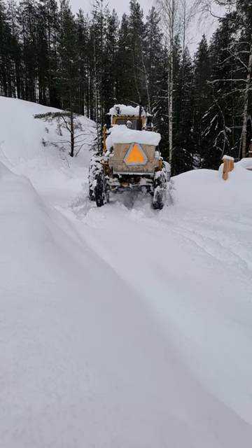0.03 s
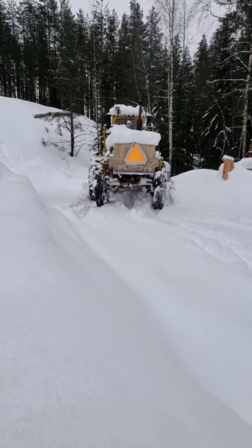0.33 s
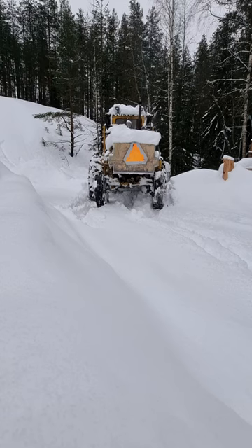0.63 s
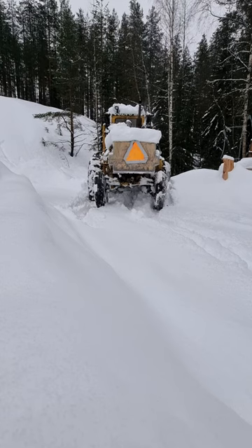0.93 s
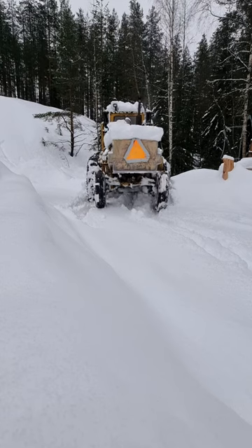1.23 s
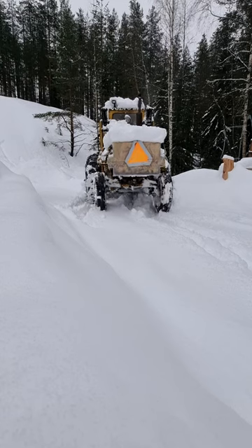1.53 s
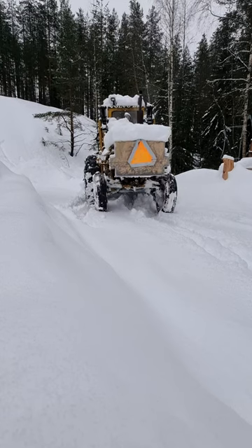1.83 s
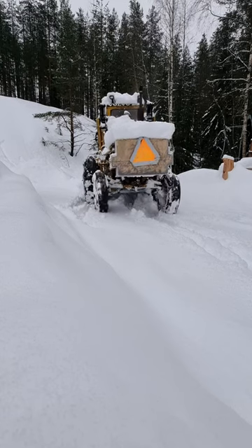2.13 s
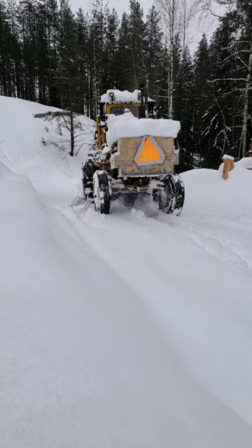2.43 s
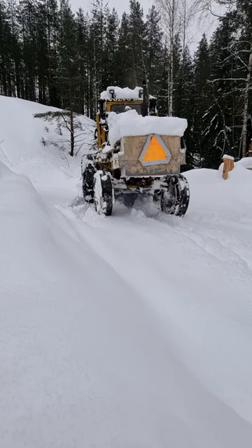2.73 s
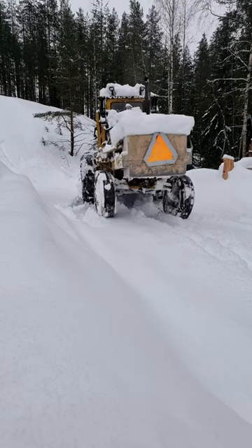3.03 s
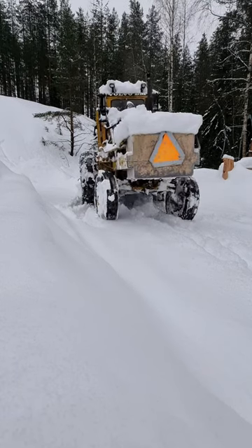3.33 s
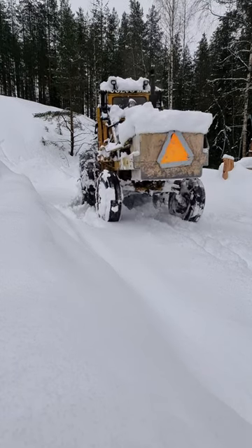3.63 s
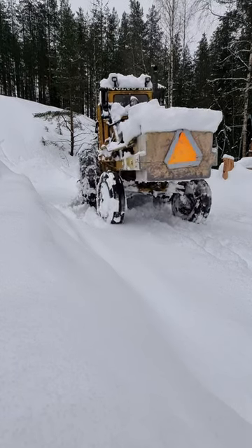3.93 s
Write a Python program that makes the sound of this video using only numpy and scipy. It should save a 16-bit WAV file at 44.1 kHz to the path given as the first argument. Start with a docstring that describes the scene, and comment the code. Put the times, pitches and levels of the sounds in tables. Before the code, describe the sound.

A loader's diesel engine chugs and clatters, eases off, then labours again at a slower pace.

```python
"""A diesel loader in the snow

A slow loader backs towards the listener; its engine labours, slackens, then labours again.
Each firing of fuel knocks the engine block and sends a deep thump through the exhaust pipe.
Under load, bursting gas adds a sharp, falling bark. Moving parts clatter; the forest echoes faintly."""
import sys
import numpy as np
from scipy import signal
from scipy.fft import rfft, irfft, next_fast_len
from scipy.io import wavfile
from scipy.ndimage import map_coordinates

SR = 44100
rng = np.random.default_rng(int(sys.argv[2]) if len(sys.argv) > 2 else 0)


def inscribe(sig):
    """Save sig as 16-bit PCM at rate SR to the path in sys.argv[1].

    A 1-D sig is mono; a 2-D sig holds one channel per row.
    Samples are clipped to [-1, 1] before scaling.
    """
    pcm = np.round(np.clip(np.atleast_2d(sig).T, -1, 1) * 32767)
    wavfile.write(sys.argv[1], SR, pcm.astype(np.int16))


N = 176400
TIME = np.arange(N) / SR

# how fast the engine runs (time [s], firings [per s])
ENGINE_SPEED = [(0.0, 19.45), (0.07, 20.23), (0.22, 22.18), (0.5, 22.5), (0.72, 22.12), (1.0, 20.6),
                (1.2, 20.08), (1.42, 19.3), (1.8, 17.29), (2.2, 15.51), (2.52, 13.68), (2.68, 15.04),
                (2.9, 14.69), (3.05, 14.12), (3.3, 14.07), (3.5, 13.67), (4.0, 13.63)]
# how hard it works, heard as the strength of the bark (time [s], level [dB])
ENGINE_LOAD = [(0, -13.5), (.04, -18), (.09, -18), (.14, -18), (.18, -21.5), (.36, -24), (.54, -26),
               (.63, -23.5), (.68, -28), (.77, -23.5), (.91, -27), (.96, -24), (1, -24.5), (1.15, -21.5),
               (1.25, -22), (1.35, -36.5), (1.45, -41.5), (1.56, -59), (2.27, -45.5), (2.41, -28),
               (2.48, -28), (2.55, -22), (2.62, -17.5), (2.69, -16), (2.83, -27), (2.96, -30.5),
               (3.03, -24), (3.1, -19), (3.17, -28.5), (3.32, -23.5), (3.39, -26.5), (3.46, -22.5),
               (3.53, -18.5), (3.61, -28.5), (3.68, -21.5), (3.83, -25), (3.97, -21)]
# how far the loader has turned away (time [s], share [0-1])
TURNED_AWAY = [(1.3, 0.11), (2.9, 0.79)]
# loudness of the machinery (time [s], body level [dB], clatter level [dB])
MACHINE_LEVELS = [(0.0, -35, -44.5), (0.39, -33.5, -42), (1.15, -33, -45.5), (1.56, -37.5, -47),
                  (1.84, -39, -49), (2.19, -38.5, -46.5), (2.61, -34, -43.5), (2.77, -36.5, -39.5),
                  (3.38, -35, -46.5), (4.0, -33.5, -46)]
# tone of the engine body's rumble (frequency [Hz], level [dB])
BODY_SPECTRUM = [(20, 10.5), (90, 9.5), (160, -7), (230, -5.5), (280, -3), (340, -4), (470, 0), (750, -6.5),
                 (1150, -3), (1700, -11.5), (3000, -30), (8000, -65)]
# tone of the moving parts (frequency [Hz], level [dB])
CLATTER_SPECTRUM = [(400, -23), (1500, 15.5), (2200, -1), (2900, 2), (3600, 5.5), (4600, 9.5), (5900, -3),
                    (7000, 3.5), (9000, 7), (15000, -41)]
# ringing of the engine covers (frequency [Hz], width [Hz], level [dB])
COVER_RINGS = [(3560, 220, -12), (5850, 500, -12)]
# tone of the rushing exhaust gas (frequency [Hz], level [dB])
RUSH_SPECTRUM = [(50, -40), (80, -8), (110, 0), (210, -3), (300, -10), (600, -30)]
# loudness of the high fizz (time [s], level [dB])
FIZZ_LEVELS = [(0, -51), (1.25, -54.5), (1.55, -78), (2, -70), (2.05, -54), (2.4, -59), (2.65, -51),
               (4, -62.5)]
# tone of the fizz (frequency [Hz], level [dB])
FIZZ_SPECTRUM = [(5000, -30), (8000, -4), (10500, -1), (15000, 0)]
# ringing of the engine block (frequency [Hz], level [dB], time to fade 60 dB [s])
BLOCK_RINGS = [(283, -15.5, 0.074), (453, -5.5, 0.058), (513, -3, .045), (606, -4, 0.058), (806, -5, 0.062),
               (1015, -23, 0.048)]
# tone of the noise in a knock (frequency [Hz], level [dB])
KNOCK_SPECTRUM = [(150, 6), (300, -5), (480, 0.5), (650, -1), (1000, -19.5), (2000, -33.5), (6000, -94)]
# extra hard knocks as the engine slackens (time [s], level [dB])
EXTRA_KNOCKS = [(1.452, -35), (1.504, -35.5), (1.611, -29), (1.777, -31), (1.951, -29.5)]
# loudness of the exhaust thump (time [s], level [dB])
THUMP_LEVELS = [(0, -20.5), (.2, -22), (.5, -27), (.9, -25), (1.2, -22), (1.45, -26), (1.65, -27),
                (1.9, -33.5), (2.2, -29.5), (2.68, -22.5), (2.95, -23.5), (3.15, -28), (3.35, -24),
                (4, -22.5)]
# deep notes of the pipe (frequency [Hz], level [dB], delay of the deepest swing [s], rise [s], fall [s])
PIPE_RINGS = [(47.5, 2, 0.0247, 0.023, 0.027), (60.3, -4, 0.0241, 0.022, 0.0031),
              (69.6, -4, -0.0089, 0.009, 0.0081), (111, -11.5, 0.0232, 0.006, .012)]
# tone of the hiss in a bark (frequency [Hz], level [dB])
HISS_SPECTRUM = [(200, -36), (700, -12.5), (1300, -10.5), (2100, -13.5), (3500, -3), (4800, 4), (6800, 3.5),
                 (10000, 11), (15000, -17)]
# notes of the bark, heard straight on and turned away
# (straight pitch [Hz], turned pitch [Hz], width [Hz], delay [s], straight level [dB], turned level [dB])
BARK_RINGS = [(5780, 5080, 240, 0.0047, 0.5, -6.5), (3982, 4010, 430, 0.0048, -1, 3.5),
              (2947, 3010, 318.8, .0065, -5, -4.5), (1337, 1317, 389.5, .006, 0.5, -4.5)]
# length of the forest echo (frequency [Hz], time to fade 60 dB [s])
ECHO_FADE = [(100, .1), (900, 0.14), (4000, 0.078), (12000, 0.071)]
# how much louder the left side is (frequency [Hz], left minus right [dB])
LEFT_RIGHT_BALANCE = [(60, -1.5), (130, -1), (350, 4.5), (700, 4), (1300, 2.5), (2600, 5.5), (5000, 3.5),
                      (7000, 5), (9000, 11), (15000, 10.5)]
# tone of the microphone (frequency [Hz], gain [dB])
MIC_RESPONSE = [(20, 0), (7200, 1), (8200, -27), (9500, -28), (11300, -20), (12600, -4), (16000, 2)]

FIRST_FIRING_S, FULL_LOAD_DB = .039, -24
RATTLE_POINT = 0.67  # share of the way from one firing to the next
BODY_DB, SHAKE_DB, CLATTER_DB, RATTLE_DB = -0.5, 2.5, -2.5, 5.5
RUSH_DB, RUSH_TURNED_DB = -54.5, 10
KNOCK_DB, KNOCK_LEAD_S, KNOCK_FOLLOWS_LOAD, BLOCK_ATTACK_S = 7.5, 0.001964, 0.18, .0012
HISS_DB, HISS_DELAY_S = 3.5, 0.002
BARK_PITCH_SCATTER, BARK_PITCH_PER_DB, BARK_SAG_PER_S = .05, .008, 34
ECHO_DB, RIGHT_DELAY_S, TOP_HZ = -10.5, .00034, 16200


def amp(db):
    """Turn decibels into a number to multiply by."""
    return 10 ** (np.asarray(db) / 20)


def unit(x):
    """Scale a signal to an average strength (rms) of 1."""
    return x / np.sqrt(np.mean(np.abs(x) ** 2) + 1e-20)


def at_hz(table, hz):
    """Read a table between its frequencies, on a log scale."""
    frequencies, values = np.transpose(table)
    return np.interp(np.log(hz + 1), np.log(frequencies + 1), values)


def at_time(table, times, column=1):
    """Read one column of a table at the given times."""
    table = np.asarray(table)
    return np.interp(times, table[:, 0], table[:, column])


def filtered(x, response):
    """Multiply each frequency in x by response(hz)."""
    size = next_fast_len(N + SR // 2)
    return irfft(rfft(x, size) * response(np.fft.rfftfreq(size, 1 / SR)), size)[..., :N]


def noise(spectrum):
    """Noise with the tone that a table gives."""
    return unit(filtered(rng.standard_normal(N), lambda hz: amp(at_hz(spectrum, hz))))


def noise_band(centre_hz, width_hz):
    """Noise gathered around one frequency."""
    return unit(filtered(rng.standard_normal(N), lambda hz: np.exp(-((hz - centre_hz) / width_hz) ** 2)))


def wobble(rate):
    """A smooth curve through `rate` random points a second."""
    return map_coordinates(rng.standard_normal(int(N * rate / SR) + 4), [TIME * rate])


def swell(t, rise, fall):
    """A rounded rise to 1 at t = 0, then a fade; times are in seconds."""
    return np.where(t < 0, np.exp(-.5 * (t / rise) ** 2), np.exp(1 - np.hypot(1, t / fall)))


def events(times, levels_db, shape):
    """Place shape(time since the event, event number) at each time and add them up."""
    out = np.zeros(N)
    for k, (when, db) in enumerate(zip(times, levels_db)):
        near = slice(*np.clip([int(when * SR) - SR // 20, int(when * SR) + SR // 10], 0, N))
        out[near] += amp(db) * shape(TIME[near] - when, k)
    return out


def pulses(times, levels_db, rise, fall):
    """One short swell at each time."""
    return events(times, levels_db, lambda t, k: swell(t, rise, fall))


def firings(share=0):
    """The times when the engine fires, or is a share of the way to its next firing."""
    times = np.arange(-SR // 10, N + SR // 10, 10) / SR
    count = np.cumsum(at_time(ENGINE_SPEED, times)) * 10 / SR
    count -= np.interp(FIRST_FIRING_S, times, count)
    return np.interp(np.arange(-1, int(count[-1])) + share, count, times)


def body_rumble():
    """The engine's body rumbles all the time and shakes harder just after each firing."""
    times = firings() + .012
    shake = pulses(times, rng.normal(SHAKE_DB, 0.5, len(times)), rise=0.0026, fall=0.005)
    return noise(BODY_SPECTRUM) * np.hypot(amp(BODY_DB), shake) * amp(at_time(MACHINE_LEVELS, TIME))


def parts_clatter():
    """Moving parts clatter, most of all late between firings, and keep the covers ringing."""
    times = firings(RATTLE_POINT)
    rattle = pulses(times, rng.normal(RATTLE_DB, 2.4, len(times)), rise=.006, fall=.005)
    covers = sum(amp(db) * noise_band(hz, width) for hz, width, db in COVER_RINGS)
    clatter = unit(noise(CLATTER_SPECTRUM) + covers)
    level_db = at_time(MACHINE_LEVELS, TIME, column=2) + 1.3 * wobble(110)
    return clatter * np.hypot(amp(CLATTER_DB), rattle) * amp(level_db)


def exhaust_rush():
    """Gas rushes from the pipe, louder once the loader has turned."""
    return noise(RUSH_SPECTRUM) * amp(RUSH_DB + RUSH_TURNED_DB * at_time(TURNED_AWAY, TIME))


def high_fizz():
    """A fine, high fizz flickers in time with the clatter, different in each ear."""
    times = firings(RATTLE_POINT)
    flicker = pulses(times, rng.normal(2, 2, len(times)), rise=.007, fall=.004)
    fizz = np.array([noise(FIZZ_SPECTRUM), noise(FIZZ_SPECTRUM)])
    level_db = at_time(FIZZ_LEVELS, TIME) + 2.2 * (wobble(11) + wobble(160))
    return fizz * np.hypot(.7, flicker) * amp(level_db)


def block_ring(t, k):
    """One rap makes the engine block ring, a little differently each time."""
    age = np.maximum(t, 0)
    ring = 0
    for hz, db, fade_s in BLOCK_RINGS:
        fade = amp(rng.normal(db, 2.84) - 60 * age / fade_s)
        ring += fade * np.sin(2 * np.pi * hz * rng.normal(1, 0.033) * age)
    return ring * (1 - np.exp(-age / BLOCK_ATTACK_S))


def combustion_knock():
    """Burning fuel raps the engine block just ahead of the bark; a few hard knocks join in."""
    times = firings()
    levels_db = rng.normal(at_time(MACHINE_LEVELS, times) + KNOCK_DB, 1.8)
    levels_db += KNOCK_FOLLOWS_LOAD * (at_time(ENGINE_LOAD, times) - FULL_LOAD_DB)
    extra_times, extra_db = np.transpose(EXTRA_KNOCKS)
    times = np.append(times - KNOCK_LEAD_S, extra_times)
    levels_db = np.append(levels_db, extra_db)
    raps = noise(KNOCK_SPECTRUM) * pulses(times, levels_db, rise=.0008, fall=0.0033)
    return amp(-4) * (raps + events(times, levels_db, block_ring))


def exhaust_thump():
    """Each firing sets the air in the exhaust pipe swinging."""
    def swing(t, k):
        return -sum(amp(db) * np.cos(2 * np.pi * hz * (t - delay)) * swell(t - delay, rise, fall)
                    for hz, db, delay, rise, fall in PIPE_RINGS)
    times = firings()
    return events(times, rng.normal(at_time(THUMP_LEVELS, times), .4), swing)


def exhaust_bark():
    """Gas bursts out in a hiss and rough notes that sag as pressure drops; harder bursts are higher."""
    times = firings()
    load_db = rng.normal(at_time(ENGINE_LOAD, times), .8)
    bursts = pulses(times + HISS_DELAY_S, load_db, rise=.0025, fall=0.0018)
    out = amp(HISS_DB) * noise(HISS_SPECTRUM) * bursts
    turned = at_time(TURNED_AWAY, times)
    for straight_hz, turned_hz, width_hz, delay, straight_db, turned_db in BARK_RINGS:
        pitch_scatter, scatter_db = rng.standard_normal((2, len(times)))
        pitch = straight_hz + (turned_hz - straight_hz) * turned
        pitch *= np.exp(BARK_PITCH_SCATTER * pitch_scatter + BARK_PITCH_PER_DB * (load_db - FULL_LOAD_DB))
        levels_db = load_db + straight_db + (turned_db - straight_db) * turned + scatter_db
        drift_hz = width_hz * noise_band(0, 2 * width_hz)
        drift_phase = 2 * np.pi * np.cumsum(drift_hz) / SR
        for wave in (np.cos, np.sin):  # together these two let the drift roughen the pitch
            def falling_note(t, k):
                phase = 2 * np.pi * pitch[k] * t * (1 - BARK_SAG_PER_S * t / 2)
                return wave(phase) * swell(t, rise=0.0019, fall=0.0017)
            out += wave(drift_phase) * events(times + delay, levels_db, falling_note)
    return out


def forest_echo(sound):
    """The trees scatter back a short echo, different in each ear."""
    hz, t, spectrum = signal.stft(rng.standard_normal((2, SR // 2)), SR, nperseg=256)
    fade = amp(-60 * t / at_hz(ECHO_FADE, hz)[:, None])
    middle, side = signal.istft(spectrum * fade, SR, nperseg=256)[1]
    tail = np.array([middle + side, middle - side])
    delayed = np.pad(sound, (SR // 200, 0))  # 5 ms later
    return signal.fftconvolve(delayed[None], tail / np.linalg.norm(tail[0]), axes=1)[:, :N]


def scene():
    """The engine and its echo reach the left side of the microphone just before the right."""
    sharp = exhaust_bark() + combustion_knock()
    engine = sharp + exhaust_thump() + exhaust_rush() + body_rumble() + parts_clatter() + high_fizz()
    air = engine + amp(ECHO_DB) * forest_echo(sharp)
    sides = np.array([[.5], [-.5]])  # left, right
    balance = lambda hz: amp(sides * at_hz(LEFT_RIGHT_BALANCE, hz))
    return filtered(air, lambda hz: balance(hz) * np.exp(2j * np.pi * hz * sides * RIGHT_DELAY_S))


def record(dry):
    """The microphone colours the sound and cuts off the highest treble."""
    return filtered(dry, lambda hz: amp(at_hz(MIC_RESPONSE, hz)) * (hz < TOP_HZ))


dry = scene()
out = record(dry)
inscribe(out)
```